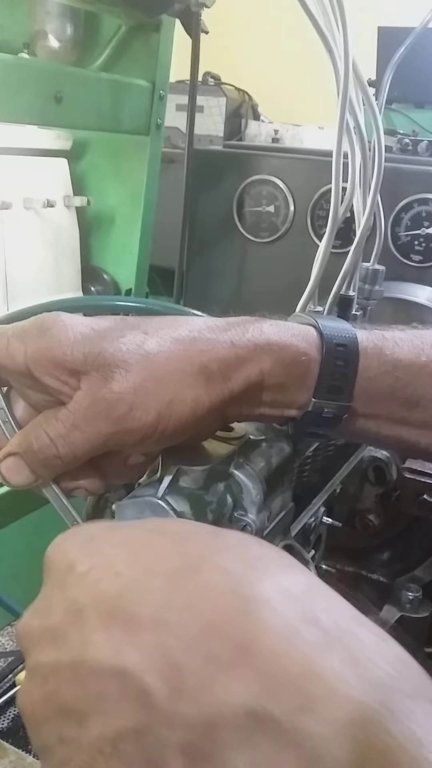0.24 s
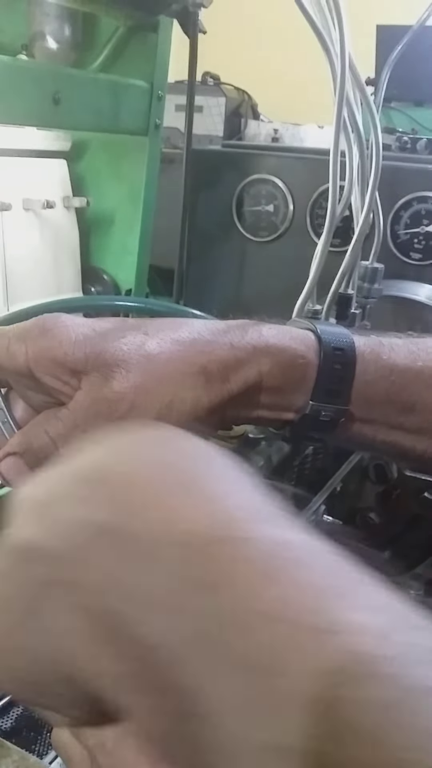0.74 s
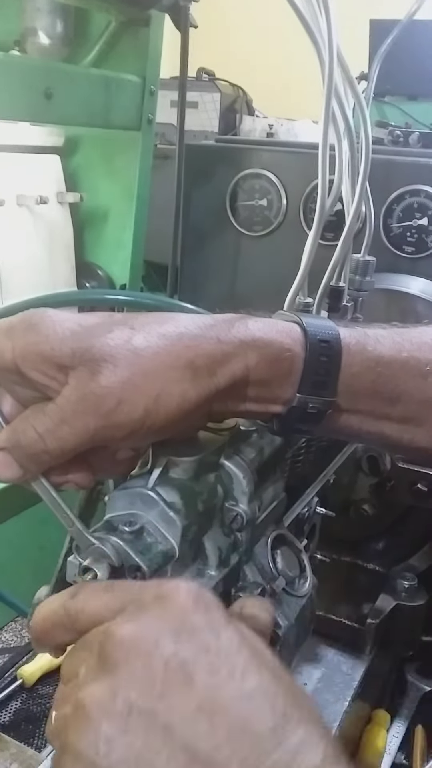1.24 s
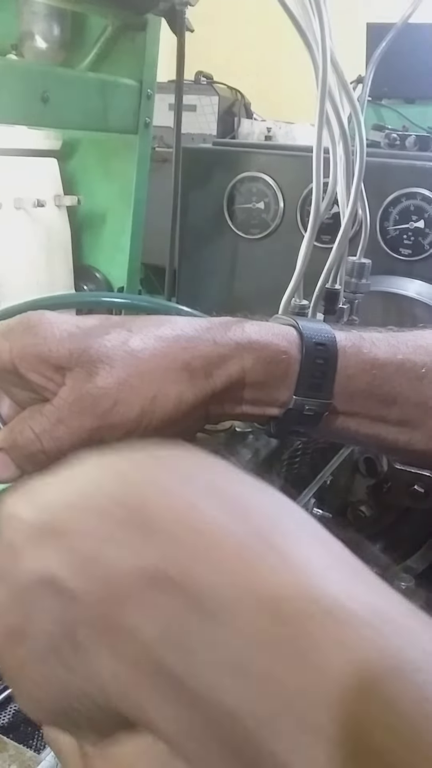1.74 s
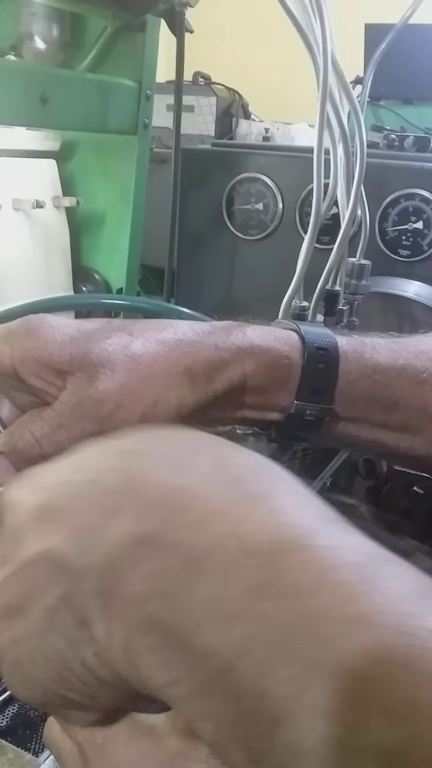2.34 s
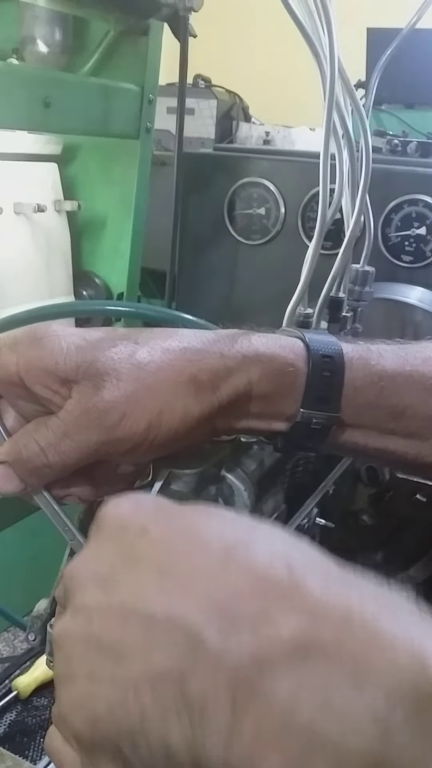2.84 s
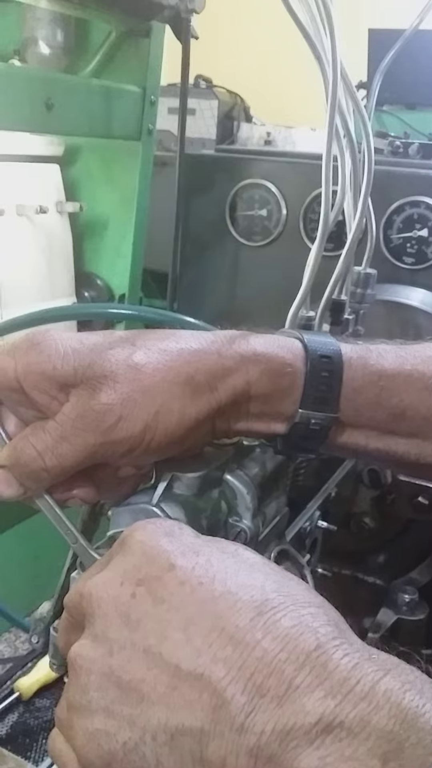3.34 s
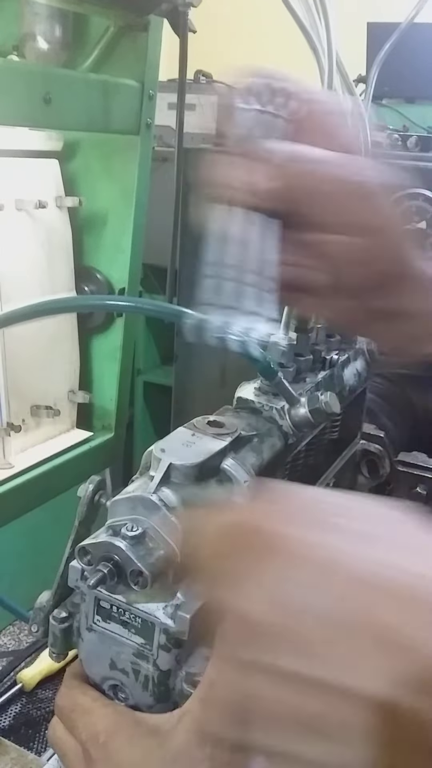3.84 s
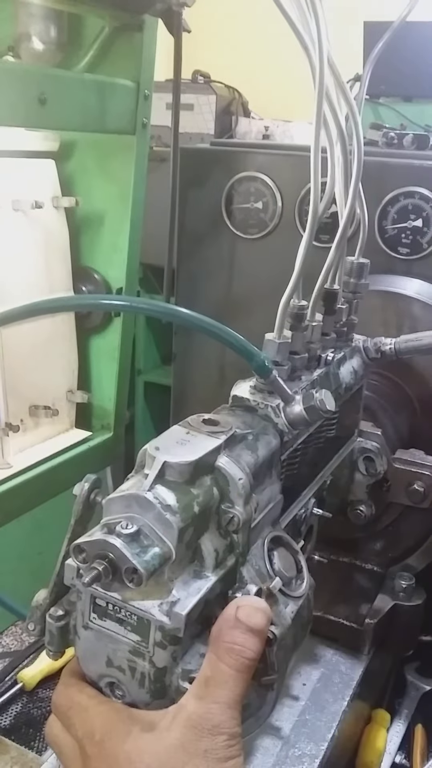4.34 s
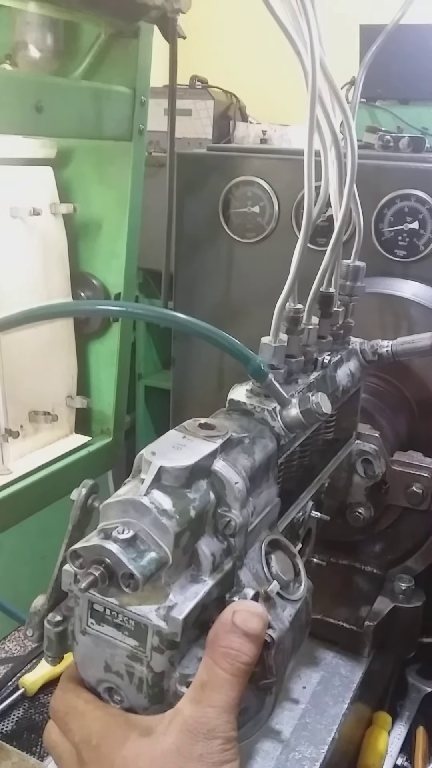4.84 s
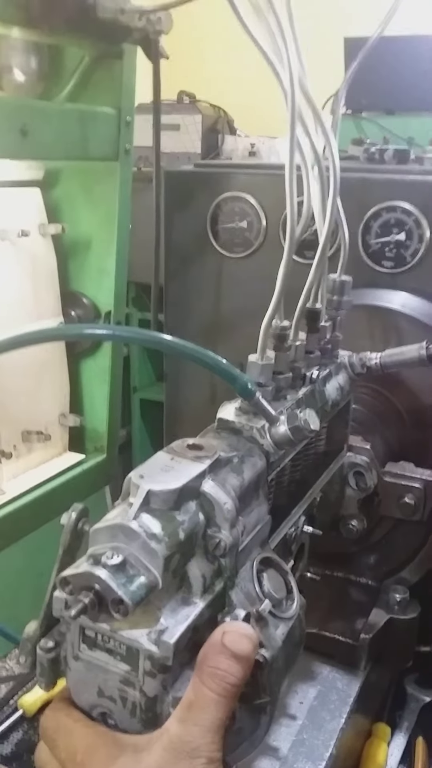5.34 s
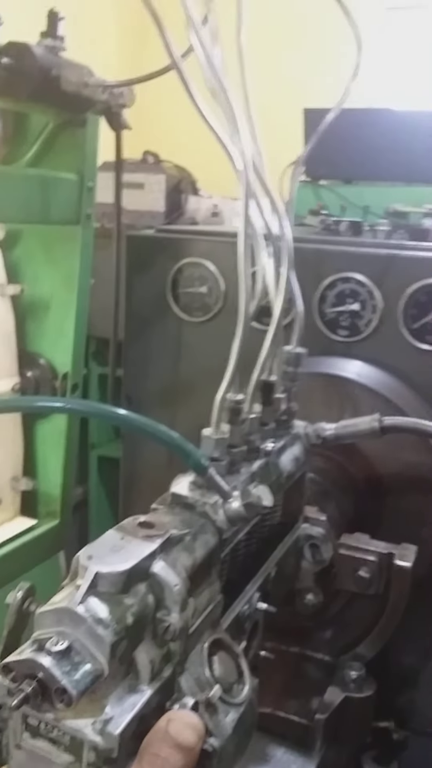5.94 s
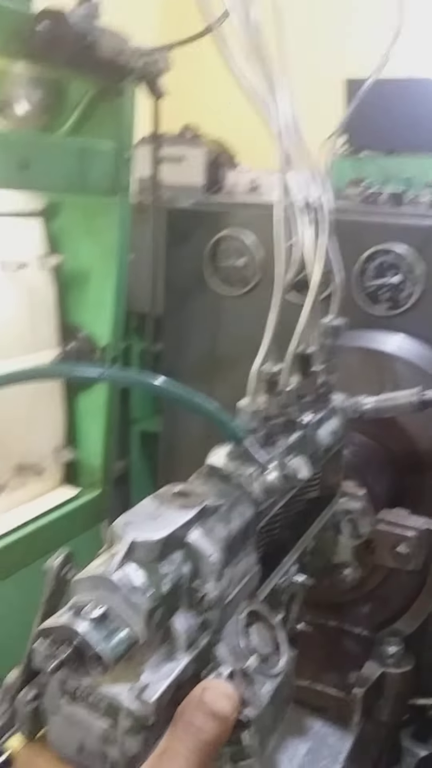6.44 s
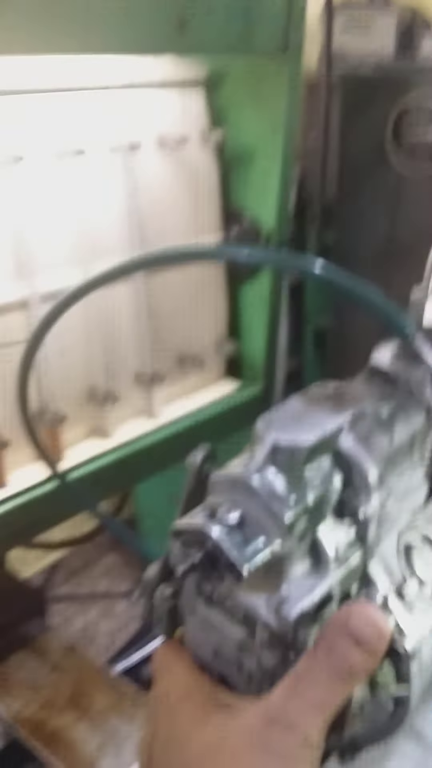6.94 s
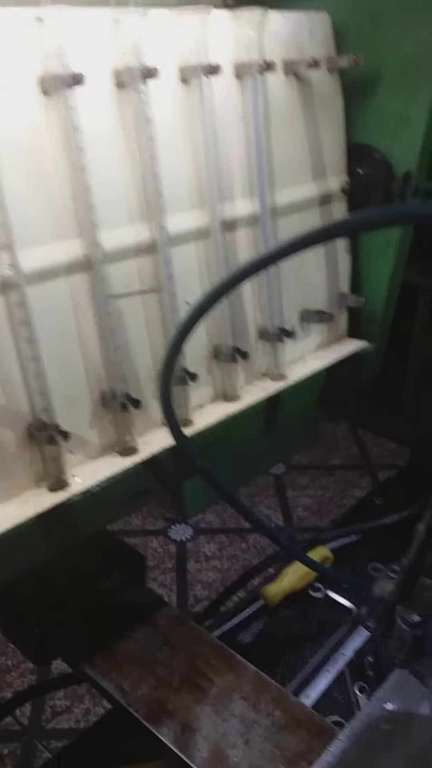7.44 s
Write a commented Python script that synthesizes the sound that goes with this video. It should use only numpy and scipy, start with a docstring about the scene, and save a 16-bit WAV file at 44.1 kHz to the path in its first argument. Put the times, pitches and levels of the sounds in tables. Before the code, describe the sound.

A fuel injection pump runs on a workshop test bench, heard close up as a steady hum with fast knocking, rattling and constant hiss. Its speed sags slightly now and then. Just past halfway a steel spanner clinks and is put down with a short ringing clatter. The pump goes quieter, then comes back up, and near the end the sound cuts out for an instant.

```python
"""A workshop, one microphone drifting close to a six-plunger injection pump on a test bench.
Each stroke knocks the housing, rattles an injector and pings a pipe over the tones of the shaft.
The bench frame booms when twice the stroke rate meets its modes; a recurring load drags the speed
down and the drive recovers. A steel spanner clinks in the hand and is put down on the bench.
Near the end the sound cuts out for a moment."""
import sys
import numpy as np
from scipy import signal
from scipy.fft import rfft, irfft
from scipy.io import wavfile

SR = 44100
rng = np.random.default_rng(int(sys.argv[2]) if len(sys.argv) > 2 else 0)


def pcm_store(signal):
    """Save signal as 16-bit PCM."""
    levels = np.round(np.clip(np.atleast_2d(signal), -1, 1) * 32767)
    wavfile.write(sys.argv[1], SR, levels.astype(np.int16).T)


N = 338688
TIME = np.arange(N) / SR
FREQ = np.fft.rfftfreq(N, 1 / SR)
CYLINDERS, FREE_STROKE_HZ = 6, 81.79

# the load comes in threes, light, heavy, medium: start_s, length_s, full_pull_hz (off the stroke rate)
LOADS = [(-0.365, 0.442, 2.509), (0.419, 0.256, 16.233), (1.507, 0.448, 3.22), (2.256, 0.655, 1.869),
         (3.191, 0.282, 14.547), (4.331, 0.39, 3.847), (5.013, 0.665, 2.131), (5.984, 0.25, 16.719),
         (7.181, 0.387, 3.971)]
# the whole pump, easing off after the spanner is put down: time_s, level_db
PUMP_LEVEL = [(0, 0.5), (.45, 0), (1.1, -1.5), (2.1, -0.94), (3.0, .3), (4.45, 0.1), (4.6, -2.6),
              (4.85, -5), (5.25, -7), (5.65, -7), (6.0, -2), (6.35, -0.8), (6.9, -0.4), (7.68, 1.1)]
# the microphone's drift toward the bright pipes, away from the hissing ones: time_s, bright_db
MIC_DRIFT = [(0, 0.5), (3.1, -1.2), (4.2, 0.4), (7.68, 3.5)]
# bench frame modes, near twice the stroke rate: pitch_hz, width_hz, resonant_level_db
FRAME_MODES = [(162.93, 4.73, -18.7), (150.63, 5.18, -27.2)]
# bench panels that sing when a shaft tone meets them: pitch_hz, width_hz, lift_db
PANEL_MODES = [(215, 45, 3), (326, 40, 10), (408, 40, 9), (796, 17, 11), (865, 16, 10), (1053, 25, 5),
               (1139, 25, 5)]
# the loosest panel, which also rings with the knocks: pitch_hz, width_hz, lift_db
LOOSE_PANEL_MODE = (799, 8.8, 4.2)
# tones of the turning shaft: cycles_per_turn, level_db
SHAFT_ORDERS = [(6, -50), (9, -43.5), (10, -45), (11, -46), (13, -44), (14, -39.5), (15, -44), (16, -37),
                (17, -44), (18, -36.8), (22, -44), (24, -35), (26, -44), (28, -43), (29, -41), (30, -34.5),
                (42, -52), (48, -45.5), (51, -48), (54, -47), (60, -39.5), (66, -42.5), (77, -45),
                (78, -39.5), (81, -45), (82, -45), (84, -40), (86, -45), (103, -43)]
# modes of the steel spanner: pitch_hz, level_db, t60_s
SPANNER_MODES = [(4613, 0, .4), (6675, -6, .4), (7273, -5, .33), (7601, -7, .3), (8010, -2, .15),
                 (10300, -1, .17), (11400, -2, .08), (11763, 1, .13), (12295, -12, .3), (12828, -6, .4),
                 (13211, -1, .42), (13625, -1, .36), (15200, -7, .15)]
# the spanner's contacts: start_s, ring_db, favoured_hz, skid_s, thud_db
SPANNER_BLOWS = [(4.094, -15.5, 12400, .003, -60), (4.503, -14.5, 11100, .004, -22),
                 (4.505, -18.5, 13800, .004, -25), (4.522, -14.5, 8000, .008, -15.5),
                 (4.542, -22, 13400, .008, -20), (4.549, -15.5, 12000, .006, -21),
                 (4.558, -23.5, 4800, .005, -30), (4.582, -12.5, 12430, .015, -40),
                 (4.608, -21.5, 7000, .01, -32), (4.624, -10, 10160, .008, -45),
                 (4.656, -22, 13300, .02, -55)]
# the plungers in firing order: knock_db, rattle_db, nozzle_db, pipe_pitch_hz, ping_db
PLUNGER_VOICES = [(-.5, 2.1, 5.5, 1100, -22.5), (0.5, 0.5, 8.5, 1950, -22), (-1.5, 2, 3.5, 2650, -19),
                  (-.5, -1, 3, 1850, -18), (-3, 0.8, -1.5, 1126, -27), (1.5, 0, 3.5, 2430, -18.5)]
# resonances of the pipes and nozzle holders: pitch_hz, width_hz, lift_db
PIPE_MODES = [(1140, 110, 3), (1850, 200, 3.5), (2450, 260, 5), (4280, 150, 1.5), (5724, 70, 3),
              (5955, 120, 5), (10305, 130, 3.5)]
# the high ring of the nozzles: frequency_hz, relative_db
NOZZLE_SPECTRUM = [(9000, -51), (10900, -19), (11500, 2.5), (11780, -1), (12200, -14), (14000, -49)]
# the knocks in the housing and bench: frequency_hz, relative_db
HOUSING_SPECTRUM = [(20, -44), (70, -21.5), (130, -8.5), (200, 5), (290, -1.5), (410, 0.5), (500, -6),
                    (620, -8.5), (800, 0), (960, -6), (1130, -3), (1500, -8), (2400, -10), (3500, -13),
                    (8000, -43.5)]
# the injector rattle: frequency_hz, relative_db
RATTLE_SPECTRUM = [(300, -53.5), (1500, -4.5), (2400, -5), (3100, -7), (4000, -1), (4900, -3.5), (5900, 0),
                   (7000, -5), (8100, -6.5), (9300, -10), (11000, -9.5), (12600, -10.5), (15700, -14)]
PLUNGER_KNOCK_DB, PLUNGER_RATTLE_DB, PLUNGER_NOZZLE_DB, PIPE_HZ, PING_DB = np.transpose(PLUNGER_VOICES)


def amp(db):
    """Decibels to gain."""
    return 10 ** (np.asarray(db) / 20)


def unit_rms(x):
    """Scales to rms 1."""
    return x / np.sqrt(np.mean(x ** 2) + 1e-20)


def curve(rows):
    """A time table, at every sample."""
    return np.interp(TIME, *np.transpose(rows))


def add(mix, start_s, sound):
    """Mixes a sound in at start_s."""
    part = mix[max(0, round(start_s * SR)):][:len(sound)]
    part += sound[:len(part)]


def band(x, centre_hz, width_hz):
    """A bell-shaped band of x."""
    return irfft(rfft(x) * np.exp(-((FREQ - centre_hz) / width_hz) ** 2), N)


def drift(hz):
    """Slow random wander of rms 1, up to about hz."""
    return unit_rms(band(rng.standard_normal(N), 0, hz))


def lift_db(modes, hz):
    """Decibels that a set of resonances adds at hz."""
    return sum(db / (1 + (2 * (hz - pitch) / width) ** 2) for pitch, width, db in modes)


def colour(x, spectrum, modes):
    """Filters by a spectrum with resonances on it, causally, so that clicks ring afterwards; rms 1."""
    hz, db = np.transpose(spectrum)
    gain_db = np.interp(np.log(FREQ + 1), np.log(hz), db) + lift_db(modes, FREQ)
    causal_fold = 1 + np.sign(N / 2 - np.arange(N)) * (np.arange(N) > 0)
    cepstrum = irfft(np.log(amp(gain_db)), N) * causal_fold
    return unit_rms(irfft(rfft(x) * np.exp(rfft(cepstrum)), N))


def load_sag(grab_s=.2577, recover_s=.1401):
    """Strokes per second lost to the load: each pull builds smoothly, then the drive catches up."""
    sag_hz = np.zeros(N)
    for start_s, length_s, pull_hz in LOADS:
        t = np.maximum(TIME - start_s, 0)
        grab = 1 - np.exp(-(t / grab_s) ** 2)
        recovery = np.exp(-np.maximum(t - length_s, 0) / recover_s)
        sag_hz += pull_hz * grab * recovery
    return sag_hz


def strokes(turns, plunger_db, rise_s, decay_s, room_db, room_s, repeat_share, jitter_s, grain_db):
    """Each plunger stroke is a burst of tiny impacts, partly the same on every turn of the shaft."""
    t = np.arange(SR // 10) / SR
    # the burst swells as the pressure builds; the workshop draws it out
    burst = unit_rms((1 - np.exp(-(t / rise_s) ** 2)) * np.exp(-t / decay_s))
    room = unit_rms((1 - np.exp(-t / decay_s)) * np.exp(-t / room_s))
    envelope = np.hypot(burst, amp(room_db) * room)
    signature = rng.standard_normal((CYLINDERS, len(t)))
    stroke = np.floor(turns * CYLINDERS).astype(int)
    out = np.zeros(N)
    for onset in np.flatnonzero(np.diff(stroke, prepend=stroke[0] - 1)):
        plunger = stroke[onset] % CYLINDERS
        noise, grain = rng.standard_normal((2, len(t)))
        slip, uneven_db = rng.standard_normal(2)
        fresh = unit_rms(noise * amp(grain_db * grain))
        impacts = np.sqrt(repeat_share) * signature[plunger] + np.sqrt(1 - repeat_share) * fresh
        add(out, onset / SR + jitter_s * slip, amp(plunger_db[plunger] + uneven_db) * envelope * impacts)
    return out


def frame_boom(turns, gain_db=.03, waver_db=.5, dip_s=4.54, dip_half_s=.038, dip_db=-17.5):
    """Shaken at twice the stroke rate, the frame booms at full speed, then beats and fades in a sag."""
    shake = np.exp(2j * np.pi * 2 * CYLINDERS * turns)
    boom = np.zeros(N)
    for hz, width_hz, db in FRAME_MODES:
        radius = np.exp(-np.pi * width_hz / SR)
        pole = radius * np.exp(2j * np.pi * hz / SR)
        boom += amp(db) * signal.lfilter([1 - radius], [1, -pole], shake).imag
    dip = np.exp(-((TIME - dip_s) / dip_half_s) ** 2)  # the hum dips briefly as the spanner lands
    return np.sqrt(2) * amp(curve(PUMP_LEVEL) + dip_db * dip + gain_db + waver_db * drift(hz=18)) * boom


def shaft_tones(turns, sag_hz, gain_db=.4, sag_db_per_hz=-.54):
    """Cams and coupling add a comb of tones that falls and weakens under load."""
    shaft_hz = (FREE_STROKE_HZ - sag_hz) / CYLINDERS
    tones = np.zeros(N)
    for order, db in SHAFT_ORDERS:
        phase = 2 * np.pi * (order * turns + rng.random()) + .13 * drift(hz=8)
        panel_db = lift_db(PANEL_MODES, order * shaft_hz)
        tones += amp(db + panel_db - np.median(panel_db)) * np.sqrt(2) * np.sin(phase)
    return amp(gain_db + curve(PUMP_LEVEL) + sag_db_per_hz * sag_hz) * tones


def spanner(let_go_s=4.4, grip_damping=5, contact_width_hz=850, taps_per_s=600,
            click_s=.005, thud_s=.0072):
    """Each blow skids in quick taps, rings the modes its contact favours, and thuds on the bench."""
    t, out = np.arange(SR // 2) / SR, np.zeros(N)
    hz, db, t60_s = np.transpose(SPANNER_MODES)[:, :, None]
    bench = signal.butter(2, [50, 750], "band", fs=SR, output="sos")
    for start_s, ring_db, favoured_hz, skid_s, thud_db in SPANNER_BLOWS:
        taps = rng.standard_normal(len(t)) * (rng.random(len(t)) < taps_per_s / SR) * (t < skid_s)
        taps[0] = 1
        weight = amp(-16) + np.exp(-((hz - favoured_hz) / contact_width_hz) ** 2)
        damping = grip_damping if start_s < let_go_s else 1
        modes = np.exp(-np.log(1000) * damping * t / t60_s) * np.sin(2 * np.pi * hz * t)
        modes = signal.fftconvolve(modes, taps[None], axes=1)[:, :len(t)]
        ring = (weight * amp(db) * modes / abs(modes).max(1, keepdims=True)).sum(0)
        click = amp(-7) * np.diff(rng.standard_normal(len(t) + 1)) / 2 * np.exp(-t / click_s)
        thud = unit_rms(signal.sosfilt(bench, rng.standard_normal(len(t)))) * np.exp(-t / thud_s)
        add(out, start_s, amp(ring_db) * (ring + click) + amp(thud_db) * thud)
    return out


def nozzle_ring(turns, gain_db=-32.5):
    """Each nozzle rings on briefly after it snaps shut, one louder than the rest."""
    snaps = strokes(turns, PLUNGER_NOZZLE_DB, rise_s=.003, decay_s=.006, room_db=-9, room_s=.02,
                    repeat_share=.3, jitter_s=.0002, grain_db=2)
    return amp(gain_db) * colour(snaps, NOZZLE_SPECTRUM, [])


def pipe_pings(turns, sag_hz, lag_s=.00152, rise_s=.0019, decay_s=.0041, uneven_db=2):
    """Each stroke jolts that plunger's steel pipe, which pings at its own pitch."""
    pings = np.zeros(N)
    for plunger, (hz, db) in enumerate(zip(PIPE_HZ, PING_DB)):
        strokes_since = (CYLINDERS * turns - plunger) % CYLINDERS
        t = np.maximum(strokes_since / (FREE_STROKE_HZ - sag_hz) - lag_s, 0)
        envelope = (1 - np.exp(-t / rise_s)) * np.exp(-t / decay_s)
        tone = np.sin(2 * np.pi * hz * t + drift(hz=8.2))
        pings += amp(db + uneven_db * drift(hz=10)) * envelope * tone
    return amp(curve(PUMP_LEVEL)) * pings


def housing_knocks(turns, sag_hz, gain_db=-27.5, sag_db_per_hz=.28):
    """The plungers knock the housing much the same way on every turn, harder under load."""
    blows = strokes(turns, PLUNGER_KNOCK_DB, rise_s=.001, decay_s=.0036, room_db=-1.5, room_s=.025,
                    repeat_share=.55, jitter_s=.00004, grain_db=2.5)
    level_db = gain_db + .96 * curve(PUMP_LEVEL) + sag_db_per_hz * sag_hz
    return amp(level_db) * colour(blows, HOUSING_SPECTRUM, PIPE_MODES + [LOOSE_PANEL_MODE])


def injector_rattle(turns, gain_db=-19.5, away_share=.51):
    """The injectors chatter and ring the pipes; the drifting microphone trades hiss for brightness."""
    chatter = strokes(turns, PLUNGER_RATTLE_DB, rise_s=.0037, decay_s=.0032, room_db=1, room_s=.051,
                      repeat_share=.31, jitter_s=.00012, grain_db=3)
    rattle = colour(chatter, RATTLE_SPECTRUM, PIPE_MODES)
    facing_db = curve(MIC_DRIFT)
    bright_change = (amp(facing_db) - 1) * band(rattle, centre_hz=4070, width_hz=350)
    hiss_change = (amp(-away_share * facing_db) - 1) * band(rattle, centre_hz=5770, width_hz=700)
    return amp(gain_db) * (rattle + bright_change + hiss_change)


def scene(start_stroke=.34, spray_sag_db_per_hz=-.0958):
    """Bench, spanner and pump at one microphone; everything on the pump follows the angle of one shaft."""
    sag_hz = load_sag()
    turns = (start_stroke + np.cumsum(FREE_STROKE_HZ - sag_hz) / SR) / CYLINDERS
    spray_db = .86 * curve(PUMP_LEVEL) + spray_sag_db_per_hz * sag_hz
    spray = amp(spray_db) * (injector_rattle(turns) + nozzle_ring(turns))
    hum = frame_boom(turns) + shaft_tones(turns, sag_hz)
    clatter = housing_knocks(turns, sag_hz) + pipe_pings(turns, sag_hz)
    return (hum + spanner() + clatter + spray)[None]


def record(dry, cut_s=6.963, resume_s=7.0815, skipped_s=.004, top_hz=15750):
    """The sound cuts out briefly and resumes a little further on; the top treble is filtered off."""
    ahead = np.roll(dry, -round(skipped_s * SR), axis=1)
    interrupted = dry * (TIME < cut_s) + ahead * (TIME > resume_s)
    lowpass = signal.firwin(511, top_hz, window=("kaiser", 9), fs=SR)
    return signal.oaconvolve(interrupted, lowpass[None], "same")


dry = scene()
out = record(dry)
pcm_store(out)
```